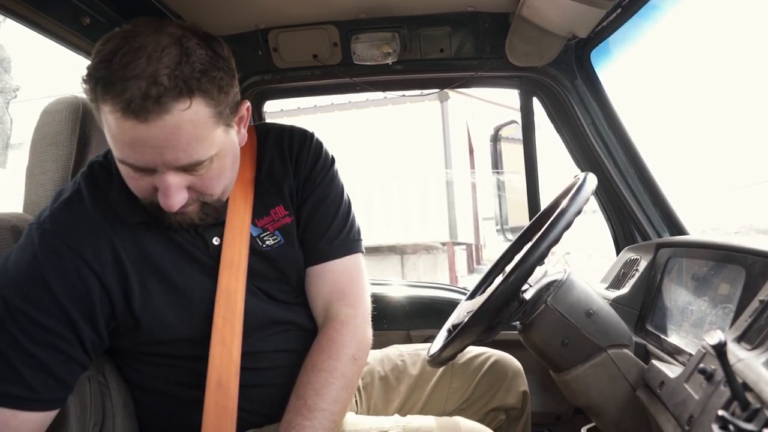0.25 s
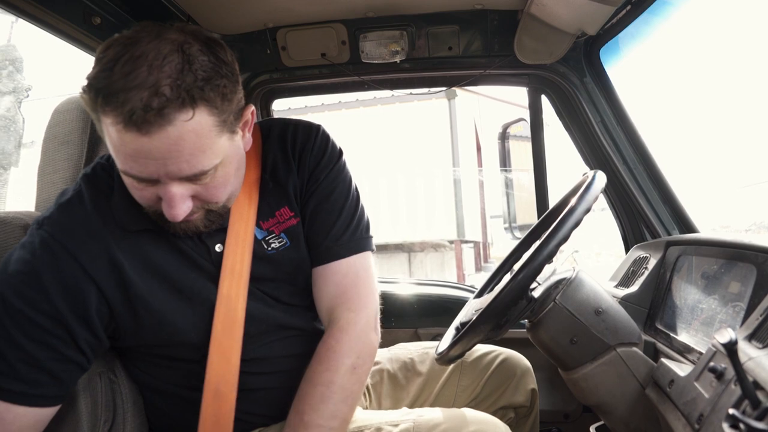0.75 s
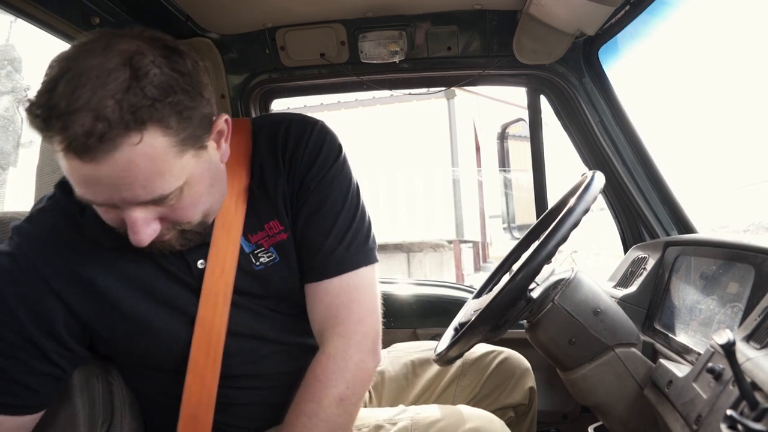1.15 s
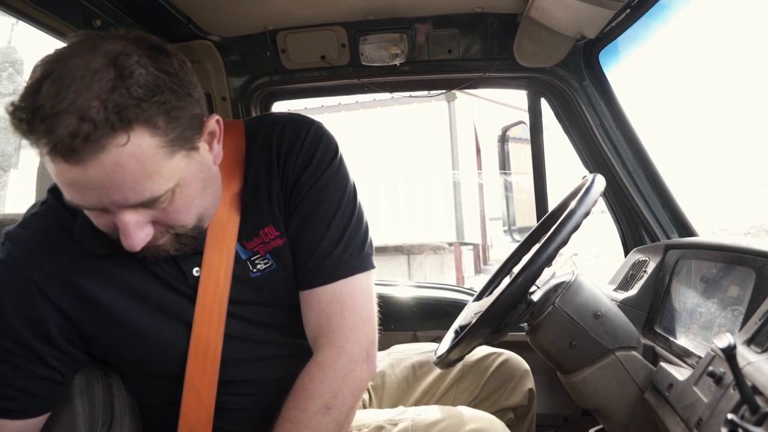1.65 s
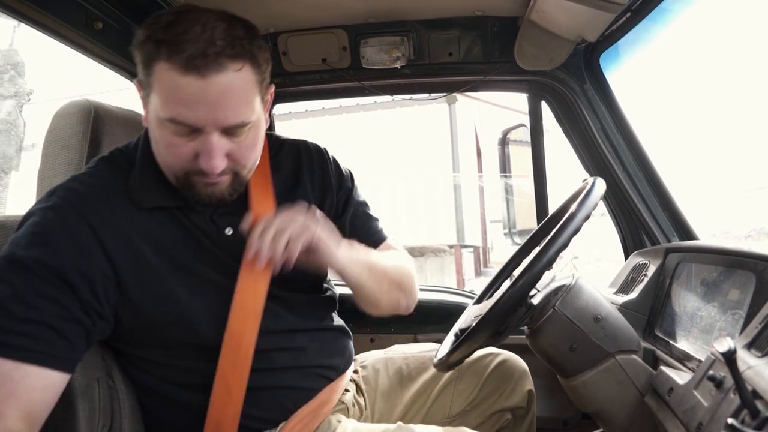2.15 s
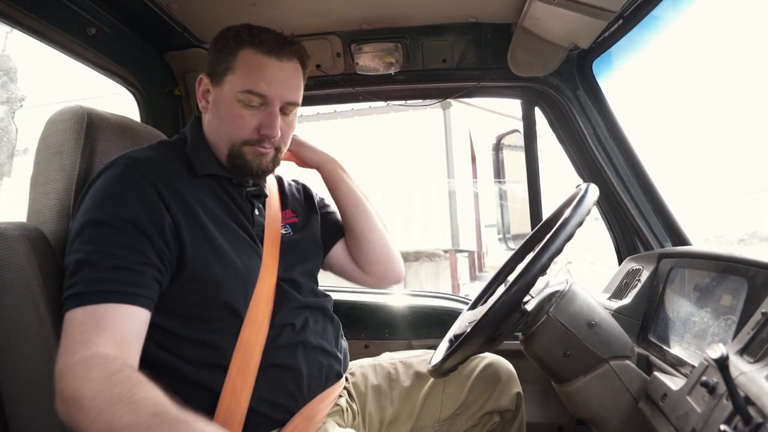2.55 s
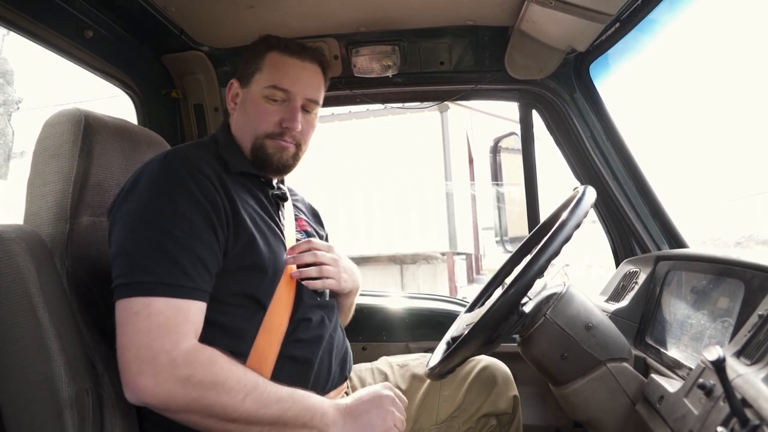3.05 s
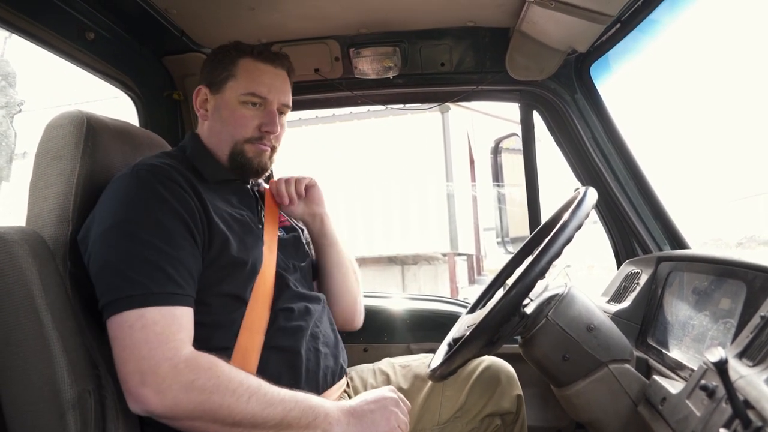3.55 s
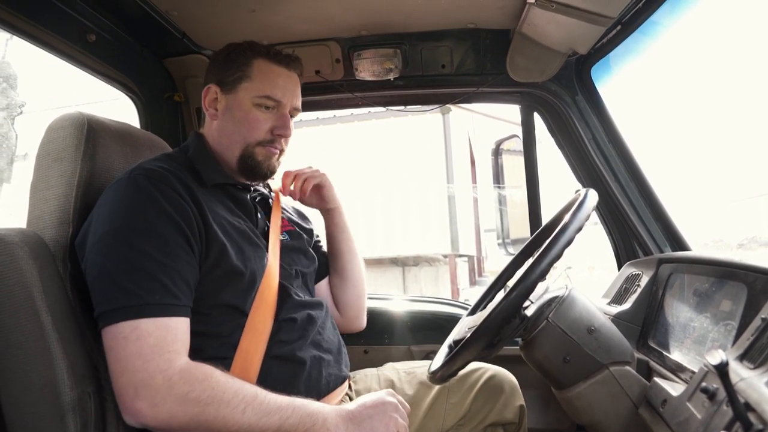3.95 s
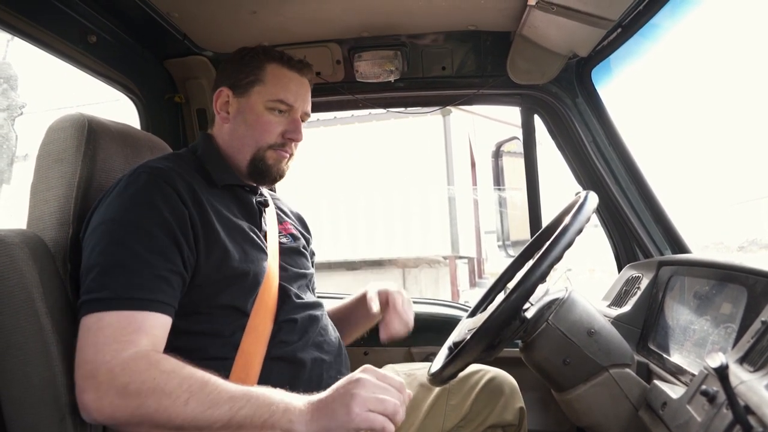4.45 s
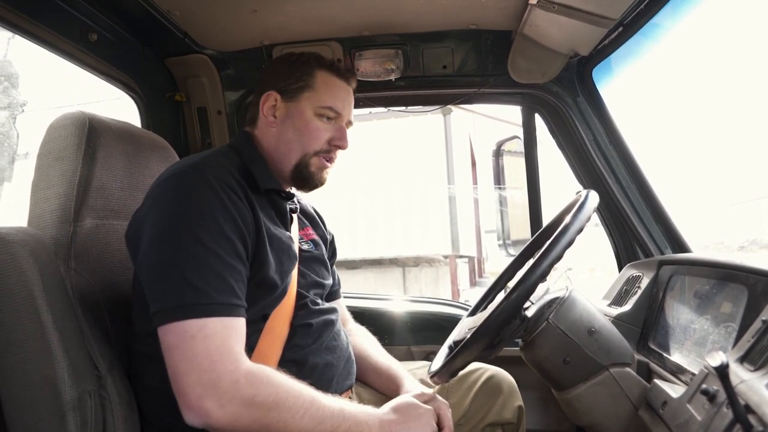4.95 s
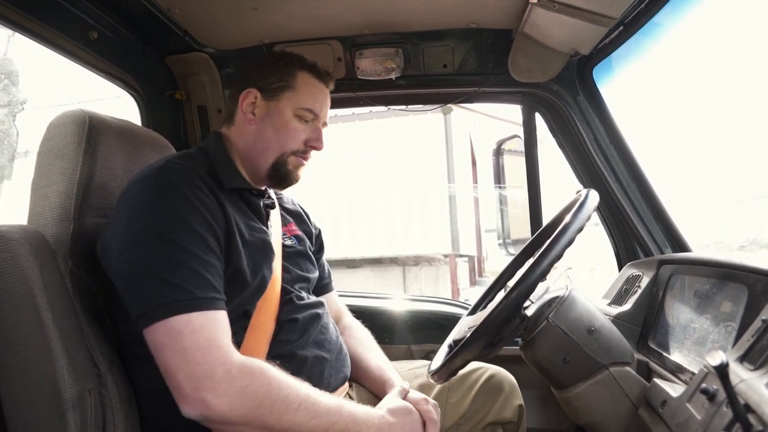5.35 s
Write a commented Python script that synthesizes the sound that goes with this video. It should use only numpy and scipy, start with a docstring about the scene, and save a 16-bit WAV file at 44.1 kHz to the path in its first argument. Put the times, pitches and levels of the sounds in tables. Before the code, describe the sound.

A seat belt is fastened in a quiet, parked truck cab, heard close and dry from a microphone clipped to the driver's shirt. Soft cloth rustle and low handling rumble come and go over a faint room tone, with scattered dull knocks. From 1 second the metal tongue taps and scrapes around the plastic buckle, growing busier around 1.5 seconds. At 1.7 seconds the latch snaps shut with a low thump and a brief metallic ring, the loudest moment. A smaller click follows at 1.9 seconds. From about 2.1 to 2.6 seconds the webbing is drawn over the chest with a soft rasping zip and a few knocks. It slides faintly again from 3 seconds, bumping the microphone with low thumps near 3.7 and 4.1 seconds. Small dry ticks and a muffled knock come around 4.9 seconds, and one last knock at 5.4 seconds as the driver settles.

```python
"""A driver fastens his seat belt in a parked truck cab, heard from a microphone clipped to his shirt.
Cloth rustles over the quiet room tone, with dull knocks and the odd belt tick here and throughout.
From 1 s the steel tongue taps around the plastic buckle; at 1.7 s the latch snaps shut and rings,
and a small click follows. He draws the webbing over his chest with a rasping zip, then lets it drop
back, bumping the microphone near 3.7 and 4.1 s. A few last ticks and knocks sound as he settles."""
import sys
import numpy as np
from scipy import signal
from scipy.fft import rfft, irfft, next_fast_len
from scipy.io import wavfile
from scipy.ndimage import uniform_filter1d, map_coordinates

SR = 44100
rng = np.random.default_rng(int(sys.argv[2]) if len(sys.argv) > 2 else 0)


def generate_wav(sig):
    """Save sig (samples, or channels by samples) to the path in sys.argv[1] as 16-bit PCM at SR."""
    pcm = np.round(np.clip(np.atleast_2d(sig).T, -1, 1) * 32767).astype(np.int16)
    wavfile.write(sys.argv[1], SR, pcm)


N = 246903
TIME = np.arange(N) / SR
HIT = np.arange(SR // 3) / SR  # time within one hit
AROUND = np.arange(-SR // 5, SR // 5) / SR  # time around the peak of one stroke


def amp(db):
    """Decibels to gain."""
    return 10 ** (np.asarray(db) / 20)


def unit(x):
    """Scale to rms 1."""
    return x / np.sqrt(np.mean(x ** 2) + 1e-20)


def crest(x):
    """Scale a hit so that its loudest 3 ms peak near 1."""
    return x / np.sqrt(4 * np.max(uniform_filter1d(x * x, size=128)) + 1e-20)


def along(points, hz):
    """Read a curve of (Hz, value) points on a log frequency axis."""
    freqs, values = np.transpose(points)
    return np.interp(np.log(hz + 1), np.log(freqs + 1), values)


def octaves(hz):
    """Octaves above 1.5 kHz, flat in the bass."""
    return np.log2(np.maximum(hz, 400) / 1500)


def wobble(rate, size=N):
    """A smooth, bounded random curve, rate knots a second."""
    knots = np.clip(rng.standard_normal(int(size * rate / SR) + 4), -1.5, 1.5)
    return map_coordinates(knots, [np.arange(size) * rate / SR])


def eq(x, db_of):
    """Minimum-phase EQ whose gain in dB is db_of(Hz)."""
    size = 2 * next_fast_len(len(x) // 2 + 4096)
    gain = np.maximum(amp(db_of(np.fft.rfftfreq(size, 1 / SR))), 1e-6)
    cepstrum = irfft(np.log(gain), size)
    cepstrum[1:size // 2] *= 2  # folded forward, so nothing rings before a hit
    cepstrum[size // 2 + 1:] = 0
    return irfft(rfft(x, size) * np.exp(rfft(cepstrum)), size)[:len(x)]


def add(track, s, sound):
    """Mix a sound into the track at time s."""
    start = round(s * SR)
    sound = sound[max(-start, 0):N - start]
    track[max(start, 0):][:len(sound)] += sound


def burst(t60, attack):
    """Noise of energy 1 that swells and dies."""
    noise = rng.standard_normal(len(HIT)) * amp(-60 * HIT / t60) * (1 - np.exp(-HIT / attack))
    return noise / np.linalg.norm(noise)


def ring(table, tilt_db, scatter_db):
    """Struck metal rings, each mode at a new strength for every hit."""
    hz, db, t60 = np.transpose(table)[:, :, None]
    level_db = db + tilt_db * octaves(hz) + scatter_db * rng.standard_normal(hz.shape)
    modes = amp(level_db - 60 * HIT / t60) * np.sin(2 * np.pi * hz * HIT)
    attack = 1 - np.exp(-HIT / 0.00057)
    return crest(modes.sum(0) * attack)


def movement(s, rise, fall, rounding=0.35):
    """Speed of one move: it builds up, rounds off at 1 at time s and dies away."""
    from_peak = (TIME - s) / np.where(TIME < s, rise, fall)
    return np.exp(rounding - np.hypot(from_peak, rounding))


def friction(spectrum, grain_db, flutter_db, tilt_db=0, size=N):
    """Threads catch and slip: grainy noise of rms 1 whose pressure flutters."""
    noise = rng.standard_normal(size)
    grains = noise * amp(grain_db * wobble(810, size) + flutter_db * wobble(45, size))
    return unit(eq(grains, lambda hz: along(spectrum, hz) + tilt_db * octaves(hz)))


# the quiet cab: freq_hz, gain_db
ROOM_TONE_EQ = [(12, -26), (20, 1.5), (53, 1), (90, -8), (137, -3.5), (268, -25), (586, -15), (969, -25),
                (1650, -32), (4630, -44), (11000, -46), (12600, -51.5), (15800, -60)]


def room_tone():
    """A faint, bass-heavy bed of noise."""
    return amp(-65) * unit(eq(rng.standard_normal(N), lambda hz: along(ROOM_TONE_EQ, hz)))


# the shirt never lies quite still: time_s, rub_db
FIDGET = [(0.28, -76.5), (0.5, -68.5), (0.85, -64), (2.8, -65.5), (4.3, -67), (4.7, -64.5), (5.6, -69.5)]
# the driver leans, reaches and settles: peak_s, rub_db, rumble_db, rise_s, fall_s
LEANS = [(0.03, -62.5, -53, 0.11, 0.089), (0.7, -61, -55, 0.063, 0.028), (1.01, -56, -49.5, 0.082, 0.064),
         (1.17, -49, -45, 0.038, 0.018), (1.3, -49, -44.5, 0.049, 0.03), (1.66, -45.5, -38, 0.057, .05),
         (2.08, -54, -57, 0.088, 0.099), (2.541, -51.5, -49.5, 0.18, 0.054),
         (3.06, -54.5, -51.5, 0.082, 0.056), (3.31, -56.5, -49, 0.088, 0.092),
         (3.67, -49.5, -39.5, 0.07, 0.046), (4.099, -50, -35.5, 0.015, 0.025)]
# tone of the handling rumble and of the rub: freq_hz, gain_db
RUMBLE_EQ = [(12, -28.5), (20, 0.5), (86, -3), (167, -14), (239, -20.5), (260, -11), (340, -42),
             (570, -120)]
RUB_EQ = [(88, -27.5), (150, -1.5), (196, -11.5), (248, -9.5), (687, -12.5), (787, -14.5), (918, -15),
          (1110, -16), (1730, -20), (2270, -24.5), (3030, -29.5), (15000, -52)]


def cloth_rustle():
    """Shirt and seat rub as the driver leans, and shake the microphone into a low rumble."""
    fidget_db = np.interp(TIME, *np.transpose(FIDGET))
    rub_power = amp(fidget_db) ** 2
    rumble_power = amp(fidget_db + 1) ** 2
    for s, rub_db, rumble_db, rise, fall in LEANS:
        speed = movement(s, rise, fall)
        rub_power += (amp(rub_db) * speed) ** 2
        rumble_power += (amp(rumble_db) * speed) ** 2
    rumble = np.sqrt(rumble_power) * friction(RUMBLE_EQ, grain_db=1, flutter_db=1)
    rub = np.sqrt(rub_power) * friction(RUB_EQ, grain_db=1.5, flutter_db=2.5)
    return rumble + rub


# the cab's panel resonances: centre_hz, half_width_hz, weight_db
PANELS = [(275, 30, -3), (480, 40, -5), (740, 60, 0), (1000, 90, -2), (1330, 50, -3), (1700, 80, -8),
          (2060, 110, -1)]
# a knock's muffled tone: freq_hz, gain_db
KNOCK_EQ = [(100, -36), (250, 4.5), (500, 3.5), (800, 2.5), (1300, -1), (2100, -4), (2700, -18.5),
            (4000, -34), (9000, -55)]
# dull knocks in the cab: start_s, level_db, tilt_db_per_octave
KNOCKS = [(0.416, -49, -11), (0.663, -42, -16), (1.0, -36, 1), (1.398, -43, -10), (1.522, -28.5, -6.5),
          (2.371, -32.5, -0.5), (2.524, -36.5, 1.5), (2.545, -38.5, 0), (3.27, -37.5, -1.5),
          (3.412, -43, -4), (3.796, -37, -0.5), (3.879, -41.5, -10), (4.089, -32.5, -0.5),
          (4.9133, -33.5, 1), (5.055, -56, -9), (5.397, -38, 1)]


def cab_knocks():
    """Soft blows spread through the cab's panels and lose their treble."""
    out = np.zeros(N)
    panels = lambda hz: sum(amp(db) / (1 + ((hz - centre) / width) ** 2) for centre, width, db in PANELS)
    for s, db, tilt_db in KNOCKS:
        tone = lambda hz: along(KNOCK_EQ, hz) + 7 * panels(hz) + tilt_db * octaves(hz)
        knock = eq(burst(t60=0.1, attack=0.0036), tone)
        add(out, s, amp(db - 2) * crest(knock))
    return out


# tone of the slipping weave: freq_hz, gain_db
WEAVE_EQ = [(60, -20.5), (200, 2), (800, 0.5), (2200, -4.0), (5000, -9.5), (10000, -20), (16000, -24)]
# quick rubs: peak_s, level_db, rise_s, fall_s, tilt_db_per_octave
SLIPS = [(0.49, -63, 0.03, 0.048, -5.5), (0.675, -56, 0.014, 0.014, -1.5), (1.168, -49, 0.015, 0.017, -7.5),
         (1.301, -50, 0.038, 0.029, -5), (1.345, -49.5, 0.027, 0.011, -4.5),
         (1.546, -49, 0.038, 0.026, -3.5), (1.651, -52.5, 0.028, 0.04, -0.5),
         (2.129, -52.5, 0.0049, 0.017, -9), (3.675, -49.5, 0.044, 0.029, 0),
         (4.047, -52.5, 0.019, 0.018, 2)]


def slips():
    """Cloth and tongue slip in short, grainy scuffs."""
    out = np.zeros(N)
    for s, db, rise, fall, tilt_db in SLIPS:
        stroke = np.exp(-(AROUND / np.where(AROUND < 0, rise, fall)) ** 2)
        scuff = friction(WEAVE_EQ, grain_db=3, flutter_db=4, tilt_db=tilt_db, size=len(AROUND))
        add(out, s + AROUND[0], amp(db) * stroke * scuff)
    return out


# the belt ticks as it shifts: start_s, level_db, pitch_hz
TICKS = [(0.527, -58, 4480), (4.8636, -49.5, 2360), (4.951, -57, 7400), (5.009, -55, 6400)]


def belt_ticks(skirt_db_per_octave=15.5):
    """The belt's edge catches and lets go with a small, dry tick."""
    out = np.zeros(N)
    for s, db, pitch_hz in TICKS:
        tone = lambda hz: -skirt_db_per_octave * np.abs(octaves(hz) - octaves(pitch_hz))
        tick = eq(burst(t60=0.0085, attack=0.00024), tone)
        add(out, s, amp(db) * crest(tick))
    return out


# belt and shirt bump the microphone: start_s, level_db, pitch_hz
BUMPS = [(0.675, -41.5, 57.4), (0.762, -40, 43.5), (1.55, -29, 254), (1.556, -34, 75), (1.610, -32, 148),
         (1.622, -23, 177), (1.634, -30, 110.5), (1.674, -20, 201), (1.68, -39, 32.9), (1.972, -42.5, 45),
         (2.556, -33, 83.5), (3.673, -24, 139), (3.678, -24.5, 51.6), (4.089, -23, 128), (4.102, -42, 52.3)]


def mic_bumps():
    """Each bump pushes the microphone through a cycle or two: a low thump."""
    out = np.zeros(N)
    for s, db, pitch_hz in BUMPS:
        cycles = pitch_hz * HIT
        swell = cycles / 0.57  # the envelope peaks after 0.57 cycles
        envelope = (swell * np.exp(1 - swell)) ** 2
        add(out, s, amp(db) * envelope * np.sin(2 * np.pi * cycles))
    return out


# ring of the buckle's frame and tongue: pitch_hz, level_db, t60_s
STEEL_MODES = [(800, -5, .05), (898, 0, .05), (1025, -2, .06), (1105, -5, .045), (1302, -12, .06),
               (1490, -18, .07), (1864, -6, .06), (2000, -9, .05), (2222, -12, .064), (2430, -11, .05),
               (2575, -9, .05), (2716, -7, .06), (2856, -3.5, .065), (3022, -10, .06), (3404, -15, .07),
               (3868, -16, .08), (4168, -15, .07), (4458, -11.5, .063), (4793, -14, .06), (6140, -11, .055),
               (8288, -23, .07)]
# the buckle's plastic housing: freq_hz, gain_db
HOUSING_EQ = [(60, -15.5), (140, -2.5), (280, -4), (550, 2.5), (900, -4.5), (1250, -11.5), (1700, -18),
              (2700, -22), (4500, -30), (6600, -36), (9000, -46.5), (15000, -60.5)]
# tongue and buckle make contact: start_s, level_db, treble_db, clatter_db
TAPS = [(0.9983, -19.5, -8, -3.5), (1.002, -31.5, -4, 5.5), (1.153, -40.5, -11, 0), (1.337, -34.5, 4, 10),
        (1.3435, -31.5, 0, -20), (1.4836, -24.5, -4, 1), (1.5302, -28, 4.5, 4.5), (1.539, -28, -1, -3),
        (1.5507, -25, -10.5, -6), (1.611, -35, -5.5, -2.5), (1.628, -29, -9.5, -0.5),
        (1.637, -29, -6, -0.5), (1.647, -39.5, 14, 5), (1.9176, -28.5, 3.5, -5.5)]


def buckle_taps():
    """Tongue and buckle knock, with one small click after latching: plastic, clatter, a little steel."""
    out = np.zeros(N)
    for s, db, treble_db, clatter_db in TAPS:
        contact = (HIT == 0) + amp(clatter_db) * burst(t60=0.12, attack=0.0011)
        tone = lambda hz: along(HOUSING_EQ, hz) + treble_db * np.clip(octaves(hz), 0, 1)
        click = crest(eq(contact, tone))
        steel = amp(-18.5) * ring(STEEL_MODES, tilt_db=0.7 * treble_db, scatter_db=4.5)
        add(out, s, amp(db) * (click + steel))
    return out


# tone of the latch's rattle: freq_hz, gain_db
RATTLE_EQ = [(120, -9.5), (300, -18), (650, -15), (950, -2), (1300, -13.5), (1620, -21), (1950, -5.5),
             (2900, -3.5), (4400, -11.5), (5200, -12), (6400, -12), (9500, -21.5), (15500, -25)]
# the latch spring sings on faintly: pitch_hz, level_db, t60_s
SPRING_MODES = [(3854, -8, .22), (4043, -3, .2), (4480, -8, .22), (5378, 0, .27)]
# the pawl's three quick contacts: start_s, level_db, tilt_db_per_octave
PAWL_HITS = [(1.6767, -14.5, -9.5), (1.6793, -11.5, -2.5), (1.6837, -12.5, 0)]


def latch_snap():
    """The sprung pawl drops through the tongue, rattles the housing and sets the steel ringing."""
    out = np.zeros(N)
    for s, db, tilt_db in PAWL_HITS:
        tone = lambda hz: along(RATTLE_EQ, hz) + tilt_db * octaves(hz)
        rattle = eq(burst(t60=0.071, attack=0.0002), tone)
        add(out, s, amp(db - 4.5) * crest(rattle))
    frame = amp(-10) * ring(STEEL_MODES, tilt_db=-0.4, scatter_db=0.7)
    spring = amp(-56) * ring(SPRING_MODES, tilt_db=0, scatter_db=1)
    add(out, PAWL_HITS[0][0], frame + spring)
    return out


# zips of the weave: peak_s, level_db, half_length_s, pitch_hz, glide_octaves_per_s, width_hz
ZIPS = [(1.975, -53, 0.015, 660, 0.5, 60), (2.272, -63, 0.068, 1334, -1, 151.4),
        (2.281, -58.5, 0.055, 918, -2, 121.6), (2.301, -55.5, 0.076, 2620, -4.5, 593),
        (2.294, -55.5, 0.076, 7060, 1.5, 3020), (2.385, -46.5, 0.017, 670, -0.5, 119.2),
        (3.335, -68.5, 0.021, 8900, -3.5, 2400), (3.57, -68, 0.049, 12850, 0, 3900),
        (4.05, -55.5, 0.015, 2190, 2, 401)]


def webbing_zips():
    """The belt's ribs run over an edge and sing a fuzzy note that glides as the belt changes speed."""
    out = np.zeros(N)
    for s, db, half_length, pitch_hz, glide, width_hz in ZIPS:
        phase = 2 * np.pi * np.cumsum(pitch_hz * 2 ** (glide * AROUND)) / SR
        note = wobble(width_hz, len(AROUND)) * np.cos(phase)
        note += wobble(width_hz, len(AROUND)) * np.sin(phase)
        stroke = np.exp(-(AROUND / half_length) ** 2)
        add(out, s + AROUND[0], amp(db) * stroke * unit(note))
    return out


# tone of the belt's rasp and of its hiss: freq_hz, gain_db
RASP_EQ = [(880, -37), (1500, 2), (2760, -1.5), (3700, -5), (4670, -6.5), (5330, -11), (6620, -11),
           (8000, -12), (10400, -32.5), (17600, -120)]
HISS_EQ = [(3240, -21.5), (5500, -2.5), (6280, -2.5), (8000, -1.5), (9510, -2.5), (13100, -7), (15800, -11)]
# the belt is drawn out or runs back: peak_s, rasp_db, hiss_db, rise_s, fall_s
PULLS = [(2.11, -62, -72, 0.1, 0.17), (2.3, -49, -55, 0.066, 0.066), (2.53, -63, -74, 0.12, 0.13),
         (3.06, -62.5, -70, .075, 0.086), (3.33, -66.5, -65.5, 0.056, .06), (3.67, -64, -61.5, 0.11, 0.13),
         (4.04, -62, -53, 0.023, 0.012), (4.87, -69, -76, 0.21, 0.19), (5.54, -77, -84, 0.2, 0.16)]


def webbing_pulls():
    """The woven belt rasps and hisses over the shirt, louder the faster it runs."""
    rasp_power, hiss_power = np.zeros(N), np.zeros(N)
    for s, rasp_db, hiss_db, rise, fall in PULLS:
        speed = movement(s, rise, fall)
        rasp_power += (amp(rasp_db) * speed) ** 2
        hiss_power += (amp(hiss_db) * speed ** 1.01) ** 2
    rasp = np.sqrt(rasp_power) * friction(RASP_EQ, grain_db=1.5, flutter_db=2.5)
    hiss = np.sqrt(hiss_power) * friction(HISS_EQ, grain_db=2, flutter_db=-0.5)
    return rasp + hiss


# the cab's reverb time: freq_hz, t60_s
CAB_DECAY = [(100, .16), (500, 0.045), (2000, 0.11), (6000, 0.13), (15000, 0.084)]


def cab_reverb(x):
    """The small upholstered cab answers with a short tail."""
    hz, t, bands = signal.stft(rng.standard_normal(SR // 3), SR, nperseg=256)
    decay = amp(-60 * t / along(CAB_DECAY, hz)[:, None])
    tail = signal.istft(bands * decay, SR, nperseg=256)[1]
    predelayed = np.pad(x, (180, 0))  # 4 ms
    return signal.fftconvolve(predelayed, tail / np.linalg.norm(tail))[:N]


def scene():
    """Only the hard hits get reverb; one microphone feeds both channels, the left a little weaker."""
    hits = latch_snap() + buckle_taps() + cab_knocks() + belt_ticks()
    mono = room_tone() + hits + amp(-22) * cab_reverb(hits) + mic_bumps()
    mono += cloth_rustle() + slips() + webbing_pulls() + webbing_zips()
    return mono * amp([[-0.25], [0.25]])


def record(dry):
    """A steep high cut takes off the very top."""
    cutoff_hz, edge_hz = 15900, 300
    size = next_fast_len(N + SR // 2)
    passband = np.clip((cutoff_hz - np.fft.rfftfreq(size, 1 / SR)) / edge_hz + 0.5, 0, 1)
    return irfft(rfft(dry, size) * passband, size)[:, :N]


dry = scene()
out = record(dry)
generate_wav(out)
```